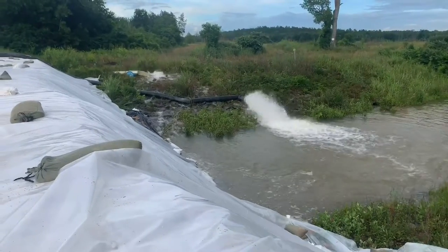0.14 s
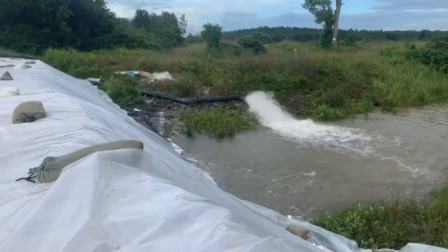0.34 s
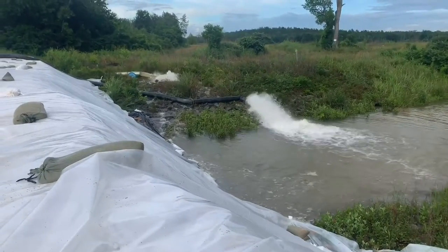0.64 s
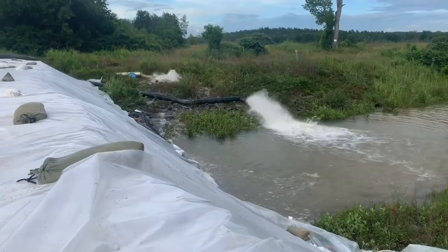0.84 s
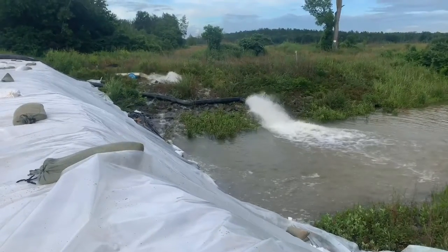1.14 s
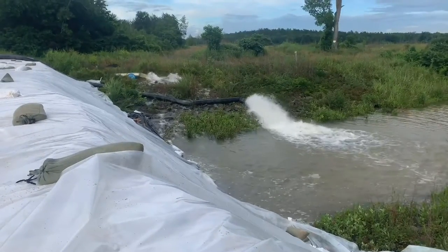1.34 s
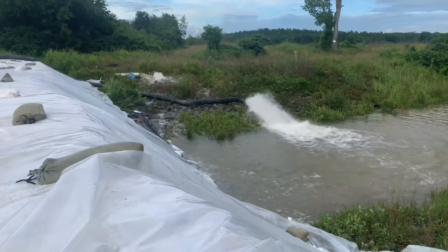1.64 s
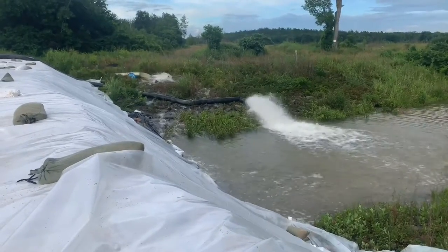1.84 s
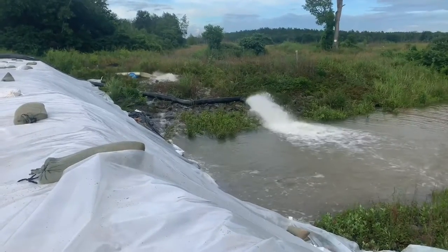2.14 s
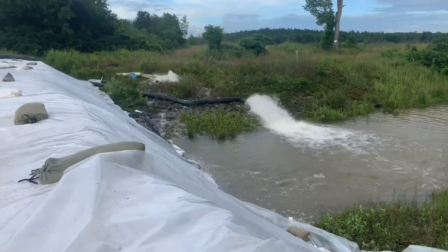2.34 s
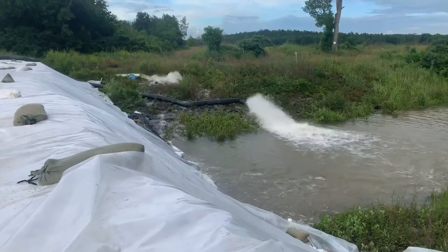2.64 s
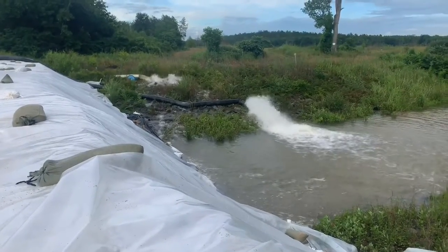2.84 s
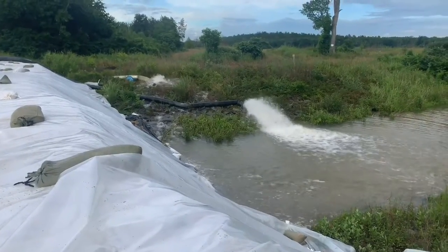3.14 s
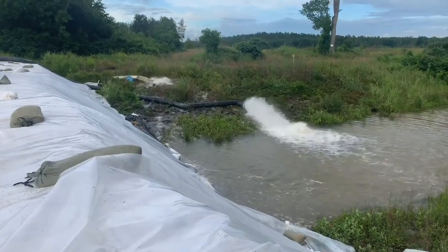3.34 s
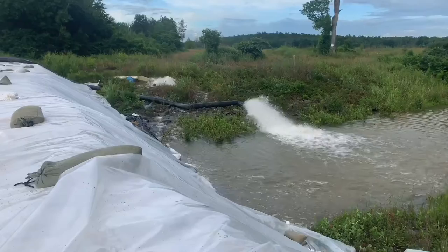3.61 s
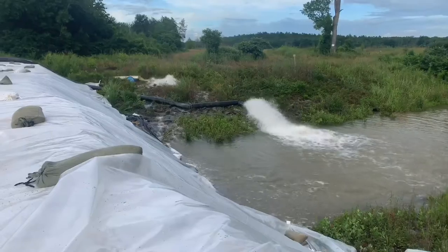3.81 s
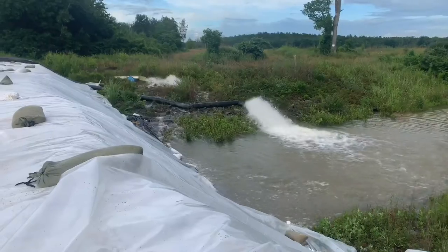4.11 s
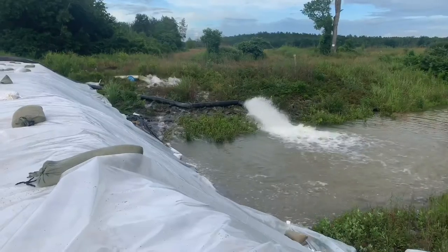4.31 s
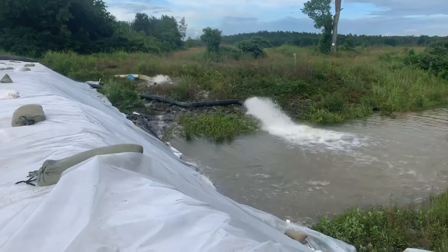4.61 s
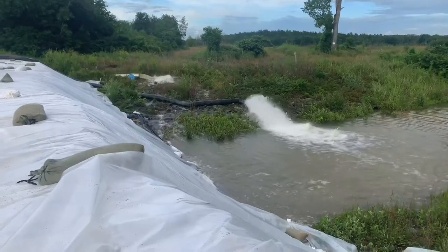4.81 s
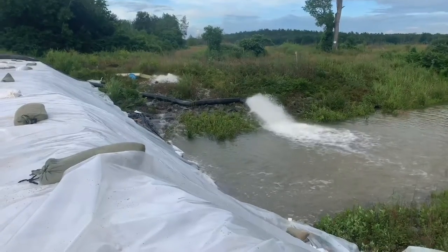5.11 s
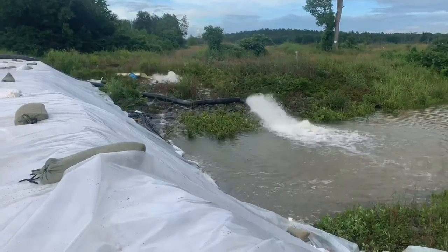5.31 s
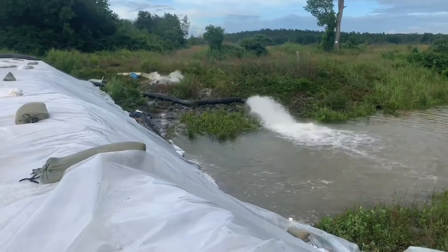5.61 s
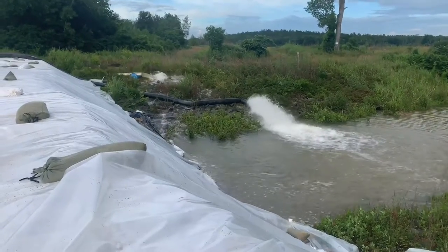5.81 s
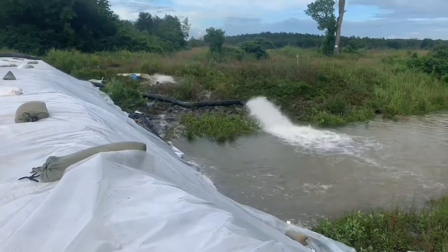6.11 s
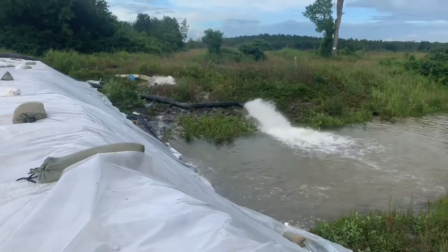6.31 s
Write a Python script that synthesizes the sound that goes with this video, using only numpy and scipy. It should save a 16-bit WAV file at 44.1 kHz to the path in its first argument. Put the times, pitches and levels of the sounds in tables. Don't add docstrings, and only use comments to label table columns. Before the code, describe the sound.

A constant pump-engine drone, leaning left, throbs quickly as two nearly matched motors drift against each other. Mechanical knocking and rushing water fill the middle, creek hiss surrounds everything, and piercing leaky-air hiss flutters at right. A tiny wet spit occurs in the centre before midway; the jet softens near the end. Close, wide stereo, open air.

```python
import sys
import numpy as np
from scipy import signal
from scipy.fft import rfft, irfft
from scipy.io import wavfile
from scipy.ndimage import uniform_filter1d

SR = 44100
rng = np.random.default_rng(int(sys.argv[2]) if len(sys.argv) > 2 else 0)


def master_out(mix):
    frames = np.transpose(np.atleast_2d(mix))
    ceiling = np.clip(frames, -1, 1)
    pcm = np.round(ceiling * 32767).astype(np.int16)
    wavfile.write(sys.argv[1], SR, pcm)


def gain_from_decibels(decibels):
    exponent = np.asarray(decibels, float) / 20
    return 10 ** exponent


N = 284886
TIME = np.arange(N) / SR
HZ = np.arange(N // 2 + 1) * SR / N
SLOW_FIRING_HZ, FAST_FIRING_HZ = 90.655, 93.555

# time in seconds, change of firing rate in Hz.
GOVERNOR = [(0.0, .84), (.38, .024), (.76, -.305), (1.14, -.186), (1.52, -.025), (1.9, .346), (2.28, -.089),
            (2.66, -.197), (3.04, -.142), (3.42, -.157), (3.8, .069), (4.18, .427), (4.56, .009),
            (4.94, -.234), (5.32, -.445), (5.7, -.31), (6.08, .165), (6.46, .105)]
# multiple of the engine cycle, slow engine level in dB, fast engine level in dB.
EXHAUST_TONES = [(2, -61.7, -57.5), (3, -48.5, -53), (4, -51, -49.5), (5, -71, -69), (6, -30, -32.5),
                 (7, -71, -53), (8, -48.5, -42), (9, -51, -40), (10, -42.5, -50), (11, -69, -51),
                 (12, -48, -46), (13, -80, -47), (14, -53.5, -43), (15, -55.5, -65), (16, -54, -47.5),
                 (17, -83, -57), (18, -79, -42), (19, -65, -57), (20, -55.5, -51.5), (21, -78, -55.5),
                 (22, -69, -55.5), (23, -84.7, -77), (24, -76.9, -67), (26, -60, -72), (27, -82, -77),
                 (28, -91, -58.5), (29, -76, -80), (30, -78, -77), (31, -62.5, -103), (32, -77, -57)]
# frequency in Hz, level in dB per Hz.
KNOCK = [(490, -75.5), (620, -81), (830, -81.5), (1000, -84), (1250, -77.5), (1430, -84), (1700, -79.5),
         (1950, -89), (2200, -83), (2600, -86), (3200, -97)]
# frequency in Hz, level in dB per Hz.
RUMBLE = [(15, -90), (40, -74), (80, -67.5), (120, -60.5), (280, -63.5), (360, -70), (500, -66),
          (620, -69.5), (830, -75), (1100, -94)]
# frequency in Hz, level in dB per Hz.
FANS = [(600, -95), (800, -78), (960, -74), (1200, -72.5), (1450, -73), (1700, -70), (1950, -83),
        (2100, -89)]
# frequency in Hz, level in dB per Hz.
JET = [(1800, -94), (1980, -78.5), (2130, -72.5), (2280, -75), (2420, -72.5), (2660, -83), (2880, -78),
       (3300, -102)]
# time in seconds, level in dB.
JET_LEVEL = [
    (0, 1),
    (.6, -1),
    (2.6, 0.5),
    (3.5, 1),
    (5.05, -1.5),
    (6.0, -3.5),
    (6.46, -7),
]
# frequency in Hz, level in dB per Hz.
VALVES = [(2600, -84), (3200, -84), (3900, -80.5), (4200, -81), (4600, -74.5), (4950, -84.5), (5500, -83.5),
          (6200, -92), (7500, -86)]
# delay in seconds, level in dB.
BOUNCES = [(.0041, -20), (.0046, -31), (.0075, -18), (0.012, -17.5), (0.018, -28), (.027, -28.5)]
# frequency in Hz, level in dB, extra lead in radians.
FAR_SIDE = [(60, -1, -0.0027), (223, -3, 0.1), (352, 0.5, 0.095), (440, -8.5, 0.25), (705, -4, 1.02),
            (927, 0.5, 0.61), (1087, -1.5, -0.24), (1200, -2.5, 0.13), (1630, 2, 0.92), (2000, -1, 1.1),
            (2070, 2, 0.61), (3020, -1, -0.26), (4200, -2.5, 0.48), (7000, 0, -0.11)]
# time in seconds, rise in dB, length in seconds.
SURGES = [(.19, 2.5, .14), (.39, 2, .16), (.54, 2, .08), (.64, 3, .12), (.78, 1.3, 0.12), (1.106, 3.5, .14),
          (1.42, 2.5, .18), (1.76, 1, .12), (2.082, 2.5, .14), (2.39, 3, 0.2), (2.65, 3.5, 0.2),
          (2.928, 2.8, 0.11), (3.08, 3, 0.16), (3.398, 3.5, 0.24), (3.599, 2, .12), (3.74, 2.5, .1),
          (4.202, 3, 0.15), (4.36, 2.5, 0.13), (4.63, 3.5, 0.11), (4.859, 4, .24), (5.064, 3, 0.18),
          (5.227, 4, 0.17), (5.45, 1.8, 0.14), (5.698, 1.5, 0.22), (6.103, 4, 0.23), (6.35, 4, .14)]
# frequency in Hz, relative level in dB.
HISS = [(5000, -18), (6500, -3), (7500, 0), (8600, 3), (8950, 3.5), (9400, -5), (9700, 1.5), (10400, 6),
        (10750, 1.5), (12000, 0.5), (14300, -8), (14800, -6.5), (15780, -2)]
# frequency in Hz, relative level in dB.
WHISTLE = [(11900, -22), (12600, -17), (13050, 6), (13350, 1), (13800, 0), (14300, -5), (14600, -16),
           (14900, -26)]
# frequency in Hz, level in dB per Hz.
EDGE = [(14700, -96), (15200, -87), (15600, -77.5), (15780, -82)]
# time in seconds, whine level in dB.
BOOST = [
    (0, -60),
    (1.9, -63),
    (2.3, -59),
    (3.2, -58),
    (3.6, -57),
    (4.5, -57),
    (4.66, -55),
    (5.45, -55),
    (5.9, -62),
    (6.46, -67),
]
# frequency in Hz, trail in half cycles.
LEAK_TRAIL = [(5000, -1.4), (6400, -.8), (7500, -.04), (8250, .04), (9200, .95), (10150, 1.05),
              (11150, 1.96), (12050, 2.04), (13350, 2.97), (13700, 3.05), (14750, 4), (16000, 4)]
# frequency in Hz, level in dB per Hz.
CREEK = [(100, -97), (400, -81.5), (1000, -81), (2000, -79.5), (3300, -79.5), (5500, -83.5), (7000, -87.5),
         (8000, -92.5), (9600, -99), (15500, -88)]
# frequency in Hz, level in dB per Hz.
SPIT = [(12300, -95), (12800, -78), (13500, -67), (13900, -76), (14200, -95)]


def over_time(table):
    seconds, values = np.transpose(table)
    return np.interp(TIME, seconds, values)


def over_frequency(table, column=1):
    points = np.transpose(table)
    return np.interp(np.log(HZ + 1), np.log(points[0]), points[column])


def walk(rate):
    hold = int(SR / rate)
    steps = np.repeat(rng.standard_normal(N // hold + 1), hold)
    smooth = uniform_filter1d(uniform_filter1d(steps, hold), hold)
    return 1.2 * smooth[:N]


def noise(spectrum, swell_db, flicker_db, flicker_rate):
    inside = (HZ > spectrum[0][0]) & (HZ < spectrum[-1][0])
    bins = rfft(rng.standard_normal(N)) * gain_from_decibels(over_frequency(spectrum)) * inside * np.sqrt(SR / 2)
    place = 2 * np.log2(HZ + 1)
    swell = walk(2.48)
    out = 0
    for band in range(int(place[inside][0]), int(place[inside][-1]) + 2):
        share = np.clip(1 - abs(place - band), 0, 1)
        level_db = swell_db * swell + flicker_db * walk(flicker_rate)
        out = out + irfft(bins * share, N) * gain_from_decibels(level_db)
    return out


def unit(x):
    return x / np.sqrt(np.mean(x ** 2))


def puffs(crank, *beats):
    power = 1 + sum(depth * np.cos(k * crank / 6 + phase) for k, depth, phase in beats)
    return np.sqrt(np.clip(power, 0, None))


def exhaust(crank, tone_db, load_db):
    multiples = np.transpose(EXHAUST_TONES)[0].round()
    out = 0
    for k, db in zip(multiples, tone_db):
        wavers = k != 6
        phase = wavers * (2 * np.pi * rng.random() + 0.068 * walk(6))
        level = gain_from_decibels(db + wavers * 1.2 * walk(5))
        out = out + level * np.cos(k * crank / 6 + phase)
    return np.sqrt(2) * gain_from_decibels(load_db) * out


def knock(crank, cycle_hz):
    size = 4096
    hz, db = np.transpose(KNOCK)
    line_hz = np.arange(size // 2 + 1) * cycle_hz
    inside = (line_hz > hz[0]) & (line_hz < hz[-1])
    gain = gain_from_decibels(np.interp(line_hz, hz, db)) * inside * np.sqrt(cycle_hz) * size / 2
    uneven = gain_from_decibels(2.5 + 2.3 * rng.standard_normal(len(gain)))
    phase = np.exp(2j * np.pi * rng.random(len(gain)))
    cycle = irfft(gain * uneven * phase, size)
    place = crank / (12 * np.pi) % 1 * size
    pattern = np.interp(place, np.arange(size + 1), np.append(cycle, cycle[0]))
    return pattern * gain_from_decibels(1.2 * walk(6))


def casings():
    return noise(RUMBLE, 0.26, 0.86, 7.3)


def fans():
    return noise(FANS, 0.4, 0.68, 9)


def water_jet(fast):
    return noise(JET, 0.58, 0.96, 9) * gain_from_decibels(over_time(JET_LEVEL)) * puffs(fast, (6, .06, -3.1))


def valve_gear(slow, fast, surge_db):
    throb = puffs(slow, (6, .15, -2.2)) * puffs(fast, (6, .2, -.6), (12, .12, .4))
    return noise(VALVES, 0.78, 1.0, 9) * throb * gain_from_decibels(0.63 * (surge_db - surge_db.mean()))


def bounces(x):
    return sum(gain_from_decibels(db) * np.roll(x, int(delay * SR)) for delay, db in BOUNCES)


def far_side(pumps):
    lag_s = .0005
    turn = over_frequency(FAR_SIDE, column=2) - 2 * np.pi * HZ * lag_s
    return irfft(rfft(pumps) * gain_from_decibels(over_frequency(FAR_SIDE)) * np.exp(1j * turn), N)


def surge():
    swells = sum(db * np.exp(-(2 * (TIME - s) / length) ** 2) for s, db, length in SURGES)
    return swells + .5 * walk(22)


def leak(slow, surge_db):
    hiss = unit(noise(HISS, 0.24, 0.74, 25)) * gain_from_decibels(-45.5 + surge_db)
    hiss = hiss * puffs(slow, (6, .13, -1.1), (12, .14, -1.7))
    whistle = unit(noise(WHISTLE, .3, 1.6, 30)) * gain_from_decibels(-45 + 1.97 * surge_db)
    whistle = whistle * puffs(slow, (2, .15, 1.1), (3, .1, -1.1), (6, .35, 2.9), (12, .12, -1.6))
    edge = noise(EDGE, 1.5, 1.1, 12) * puffs(slow, (6, .2, -.9), (12, .12, -1.4))
    return hiss + whistle + edge


def turbo(surge_db):
    hz = 11005 + 9 * walk(30)
    whine_db = over_time(BOOST) + 0.55 * surge_db + 2.5 * walk(12)
    fade_db = 1.6 * np.minimum(whine_db + 59.0, 0)
    level = gain_from_decibels(whine_db + fade_db + 1.3 * walk(40))
    return np.sqrt(2) * level * np.cos(2 * np.pi * np.cumsum(hz) / SR)


def trailing_side(air):
    return irfft(rfft(air) * np.exp(-1j * np.pi * over_frequency(LEAK_TRAIL)), N)


def creek():
    return np.array([noise(CREEK, 0.99, 0.96, 13) for _ in range(2)])


def spit():
    start_s, length_s = 2.405, .03
    return noise(SPIT, .1, .1, 9) * gain_from_decibels(3) * np.exp(-(2 * (TIME - start_s) / length_s) ** 2)


def scene():
    hunt_hz, surge_db = over_time(GOVERNOR), surge()
    slow = 2 * np.pi * np.cumsum(SLOW_FIRING_HZ + 0 * TIME) / SR - 1.4
    fast = 2 * np.pi * np.cumsum(FAST_FIRING_HZ + hunt_hz) / SR - .87
    _, slow_db, fast_db = np.transpose(EXHAUST_TONES)
    tones = exhaust(slow, slow_db, hunt_hz) + exhaust(fast, fast_db, -0.2 * hunt_hz)
    knocks = knock(slow, SLOW_FIRING_HZ / 6) + knock(fast, FAST_FIRING_HZ / 6)
    body = knocks + casings() + fans() + water_jet(fast) + valve_gear(slow, fast, surge_db)
    pumps = tones + body + bounces(body)
    air = leak(slow, surge_db) + turbo(surge_db)
    left = pumps + trailing_side(air)
    right = far_side(pumps) + air
    return np.array([left, right]) + creek() + spit()


def roll_off(x):
    return signal.sosfilt(signal.butter(12, 15800, fs=SR, output="sos"), x)


def record(dry):
    return roll_off(dry)


dry = scene()
out = record(dry)
master_out(out)
```